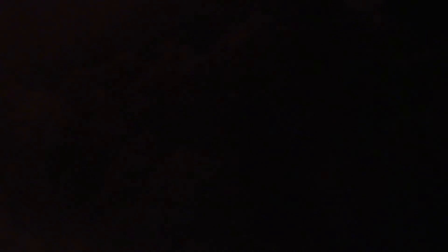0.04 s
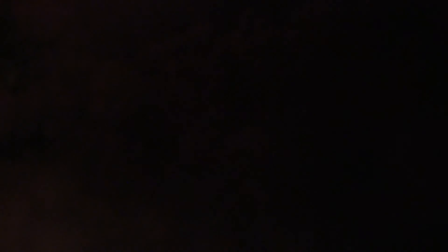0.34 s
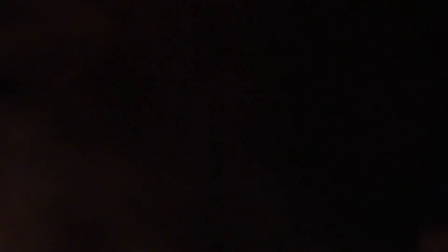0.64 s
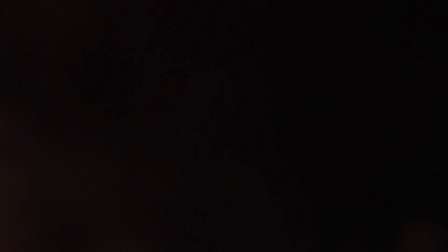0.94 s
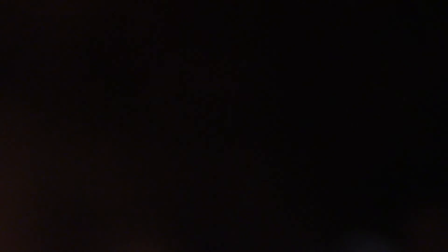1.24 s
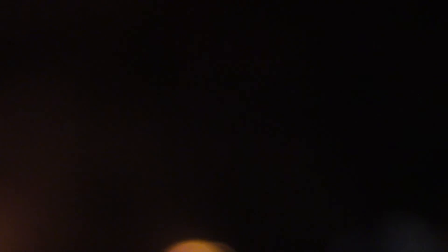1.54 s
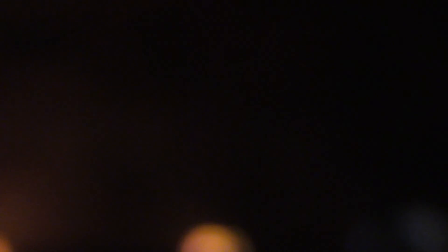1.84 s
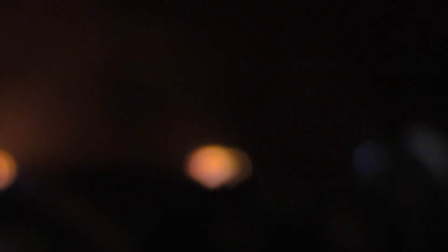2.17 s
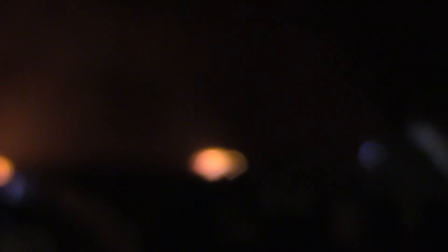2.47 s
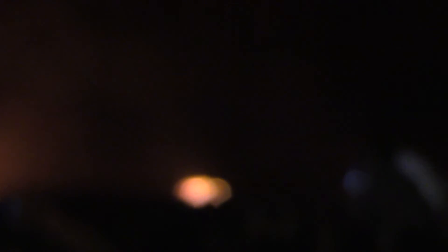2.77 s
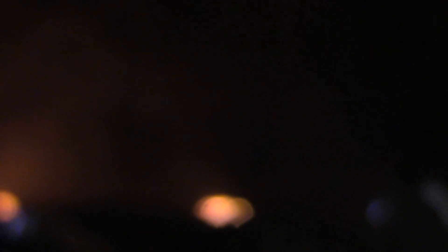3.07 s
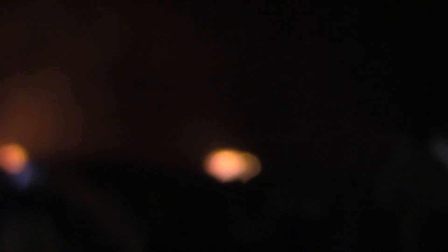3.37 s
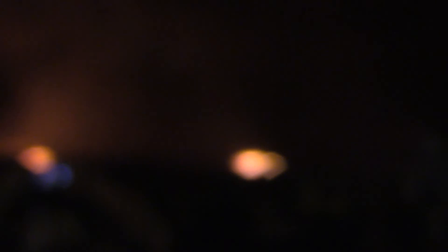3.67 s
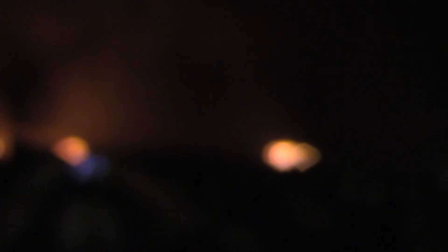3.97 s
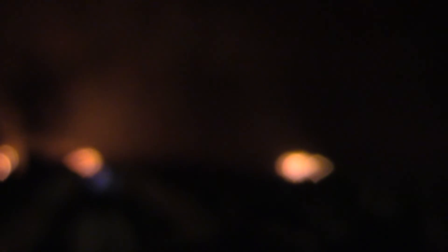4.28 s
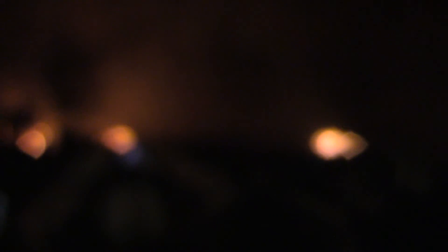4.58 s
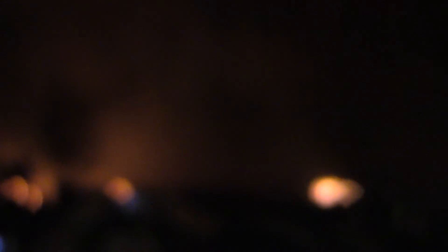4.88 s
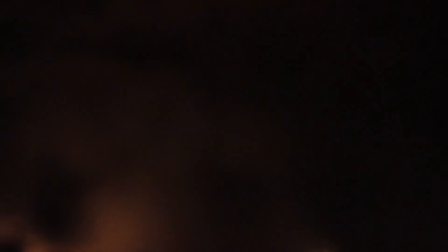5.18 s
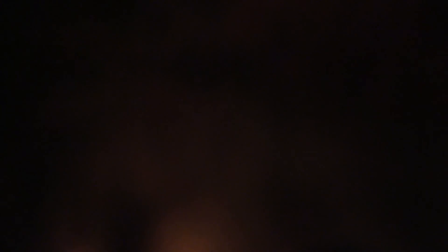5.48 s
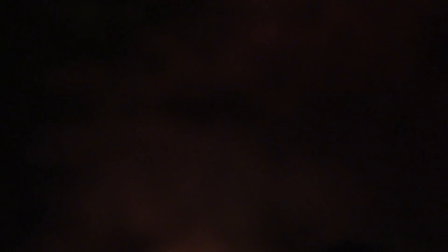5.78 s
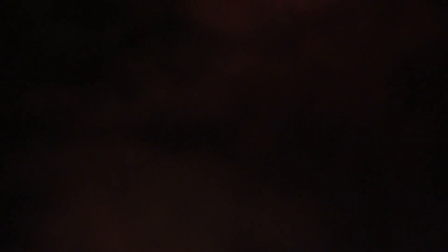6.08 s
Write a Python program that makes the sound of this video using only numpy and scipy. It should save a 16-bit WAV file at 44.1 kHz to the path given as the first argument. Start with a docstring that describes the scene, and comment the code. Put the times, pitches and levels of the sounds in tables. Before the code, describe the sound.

Several machine guns fire overlapping bursts outdoors over a roar of distant shots, growing heavier and ending in a few booms.

```python
"""Machine guns fire over one another on an open range at night, heard from behind the firing line.
A bright gun fires bursts of ringing cracks over a roar of far shots and echoes, heard thin and hollow
until the recorder's wind filter opens and lets the bass in. From 1.5 s a deeper gun keeps up a long
rattle, dotted with rifle pops; it grows heavier and ends near 5 s in a few booms, leaving the roar
and a brief hiss. Scattered reflections smear the reports, so that each swells and then decays."""
import sys
import numpy as np
from scipy import signal
from scipy.fft import rfft, irfft, next_fast_len
from scipy.io import wavfile
from scipy.ndimage import uniform_filter1d, minimum_filter1d

SR = 44100
rng = np.random.default_rng(int(sys.argv[2]) if len(sys.argv) > 2 else 0)


def write(x):
    x = np.atleast_2d(x).T
    wavfile.write(sys.argv[1], SR, np.round(np.clip(x, -1, 1) * 32767).astype(np.int16))


N = 274302
TIME = np.arange(N) / SR
FFT_SIZE = next_fast_len(N + 8192)
FREQS = np.arange(FFT_SIZE // 2 + 1) * SR / FFT_SIZE

# spectrum of a gun's crack: (frequency [Hz], level [dB])
CRACK_SPECTRUM = [(40.0, -34), (150.0, -39), (500.0, -15.5), (1500.0, 2.5), (3500.0, 6.5), (6000.0, -5),
                  (9000.0, -15), (12000.0, -26.5), (15000.0, -58)]


def from_db(db):
    """Amplitude grows tenfold for every 20 dB."""
    return 10 ** (np.asarray(db) / 20)


def at_time(rows, s):
    """Linear interpolation of a table's columns in time."""
    times, *columns = np.transpose(rows)
    return np.array([np.interp(s, times, c) for c in columns])


def at_hz(rows, hz):
    """Interpolation of a table's columns on a logarithmic frequency axis."""
    points, *columns = np.transpose(rows)
    return np.array([np.interp(np.log(hz + 1), np.log(points), c) for c in columns])


def filtered(x, response):
    """Convolution in time is multiplication by a frequency response."""
    return irfft(rfft(x, FFT_SIZE) * response, FFT_SIZE)[..., :N]


def coloured(x, spectrum):
    """Zero-phase filtering imposes a tabulated spectrum."""
    return filtered(x, from_db(at_hz(spectrum, FREQS)[0]))


def resonant(x, resonances):
    """Resonances and antiresonances make bell-shaped peaks and dips in the spectrum."""
    gain_db = sum(db * np.exp(-((FREQS - hz) / width_hz) ** 2) for hz, width_hz, db in resonances)
    return filtered(x, from_db(gain_db))


def scatter(per_s, spread_db):
    """Scattering: two uncorrelated showers of wavefronts of uneven size, with unit power per Hz."""
    arrives = rng.random((2, N)) < per_s / SR
    sizes = from_db(spread_db * np.clip(rng.standard_normal((2, N)), -2, 2))
    fronts = arrives * sizes * rng.choice([-1, 1], (2, N))
    return fronts / fronts.std() * np.sqrt(SR / 2)


def swells(times, levels_db, rise_s, decay_s):
    """Reverberant envelope: reflections build up and die away; incoherent reports add in power."""
    age = TIME[:SR // 2]
    shape = (1 - np.exp(-(age / rise_s) ** 2)) * np.exp(-age / decay_s)
    power = np.zeros(N)
    for s, db in zip(times, levels_db):
        start = int(np.clip(s * SR, 0, N - 1))
        power[start:start + len(shape)] += (from_db(db) * shape[:N - start]) ** 2
    return np.sqrt(power)


def far_rattle(nominal_per_s, uneven_db, decay_s, guns=4):
    """Superposition of far guns, each cycling at its own rate, gives an envelope of mean power 1."""
    rates = nominal_per_s * np.linspace(.75, 1.3, guns)[:, None]
    times = ((np.arange(160) + rng.random((guns, 1))) / rates).ravel()
    levels = uneven_db * rng.standard_normal(len(times))
    heard = times < TIME[-1]
    envelope = swells(times[heard], levels[heard], rise_s=0.0024, decay_s=decay_s)
    return envelope / np.sqrt(np.mean(envelope ** 2))


def roar(rattle_share, hollow_octaves, frame=2048):
    """Far shots and echoes superpose, heard thin and hollow until the recorder's wind filter opens."""
    # base spectrum: (frequency [Hz], level [dB])
    spectrum = [(40.0, -62), (90.0, -48), (150.0, -30.5), (230.0, -19.5), (380.0, -10.5), (520.0, -6),
                (800.0, -3.5), (1300.0, 0), (2300.0, -1), (3600.0, -0.67), (5700.0, -11), (7500.0, -21),
                (10000.0, -32.5), (15000.0, -71)]
    # four registers, the bass let in as the wind filter opens; each: (time [s], level [dB])
    bass = [(0, -63), (1.2, -62.5), (2.04, -68), (2.09, -62), (3.2, -53), (4.3, -51), (4.9, -46),
            (5.15, -38), (5.45, -42.5), (5.8, -38.5), (6.22, -41)]
    low_mid = [(0, -56.5), (1.2, -57), (2.1, -63), (2.53, -64), (2.57, -64), (3.1, -60.5), (4.0, -55.5),
               (4.7, -48), (5.2, -45.5), (5.7, -46), (6.22, -45.5)]
    high_mid = [(0, -51.5), (0.35, -52.5), (0.6, -51.5), (1.3, -53), (1.55, -53.5), (2.4, -56.5),
                (3.2, -51), (4.85, -51), (5.3, -51.5), (5.42, -55.5), (5.55, -53), (6.22, -60)]
    treble = [(0, -50), (0.36, -52.5), (0.6, -51), (1.36, -51.5), (1.5, -57), (2.5, -58), (2.9, -52.5),
              (5.3, -51.5), (5.42, -56), (5.55, -56), (6.22, -74)]
    # reach of the registers: (frequency [Hz], weights of bass, low mid, high mid, treble [0-1])
    weights = [(60, .4, 0, 0, .6), (130, 1, 0, 0, 0), (250, 1, 0, 0, 0), (560, 0, 1, 0, 0),
               (1100, 0, .25, .75, 0), (2600, 0, 0, 1, 0), (7500, 0, 0, 0, 1)]
    # course of the wind filter's dip: (time [s], centre [Hz], depth [dB])
    wind_filter_dip = [(0, 348, 8), (2.04, 343, 12.5), (2.08, 506, 15), (2.53, 480, 10), (2.56, 560, 0.5),
                       (3.6, 660, -2), (4.4, 420, 0.5), (6.2, 403, 4)]
    rattle = far_rattle(nominal_per_s=11.0, uneven_db=3.0, decay_s=0.044)
    wash = scatter(per_s=14000, spread_db=1.0) * np.sqrt(1 - rattle_share + rattle_share * rattle ** 2)
    hz, s, frames = signal.stft(wash, SR, nperseg=frame)
    registers_db = np.vstack([at_time(curve, s) for curve in (bass, low_mid, high_mid, treble)])
    level_db = at_hz(spectrum, hz).T + at_hz(weights, hz).T @ registers_db
    centre_hz, depth_db = at_time(wind_filter_dip, s)
    hollow_db = depth_db * np.exp(-(np.log2((hz[:, None] + 1) / centre_hz) / hollow_octaves) ** 2)
    return signal.istft(frames * from_db(level_db - hollow_db), SR, nperseg=frame)[1][:, :N]


def echo_tones(width_hz):
    """Gliding tones swell and fade like echoes; phase diffusion widens each into a narrow band."""
    # (time [s], frequency [Hz], glide [octaves/s], level [dB], decay [s])
    tones = [(0, 2210, -0.024, -22.5, 0.17), (0.39, 2200, -0.1, -23, 0.09), (3.09, 527, 0.043, -29, 0.088),
             (4.995, 562, -0.076, -20, 0.055), (5.015, 646, 0.031, -17, 0.07), (5.1, 803, 0.082, -22, 0.13),
             (5.145, 605, 0.3, -23, 0.07), (5.19, 656, 0.6, -17, 0.081), (5.286, 522, -0.079, -11.5, 0.03),
             (5.322, 698, -0.74, -12, 0.05), (5.385, 650, -0.5, -25, 0.04), (5.465, 718, -1.3, -17, 0.035),
             (6.16, 676, 0.054, -17.5, 0.053)]
    ringing = np.zeros(N)
    for s, hz, glide, db, decay_s in tones:
        pitch = hz * 2 ** (glide * np.clip(TIME - s, 0, .5))
        waver = rng.standard_normal(N) * np.sqrt(2 * np.pi * width_hz / SR)
        phase = np.cumsum(2 * np.pi * pitch / SR + waver)
        ringing += np.sin(phase) * swells([s], [db], rise_s=0.01, decay_s=decay_s)
    return signal.sosfilt(signal.butter(2, [400, 2600], "band", fs=SR, output="sos"), ringing)


def bright_rounds(cycle_s=0.13):
    """Periodic firing: the times of the bright gun's rounds while its trigger is held."""
    # (first round [s], trigger released [s])
    bursts = [(0.03, 0.1), (0.368, 0.56), (0.64, 1.35)]
    return np.concatenate([np.arange(start, stop, cycle_s) for start, stop in bursts])


def bright_gun(repeat_share, crack_db=-49, sizzle_db=-62, sizzle_lag_s=0.018):
    """Multipath echo: part of each ringing crack returns by the same paths every round."""
    # metallic ring: (frequency [Hz], width [Hz], gain [dB])
    resonances = [(1320, 100, 6), (1590, 120, -8), (2120, 45, 1.5), (2240, 55, -4), (2560, 240, -5),
                  (3080, 55, 4), (3250, 55, 1.5), (4400, 260, -7)]
    # (frequency [Hz], level [dB])
    sizzle_spectrum = [(1000, -22), (4000, 10), (7000, 1), (10000, -9), (13000, -23), (15000, -28)]
    times = bright_rounds()
    impulses = np.zeros(N)
    impulses[(times * SR).astype(int)] = 1
    smear = swells([0], [crack_db], rise_s=0.029, decay_s=0.058)
    same_paths = filtered(scatter(per_s=15000, spread_db=1.0) * smear, rfft(impulses, FFT_SIZE))
    echo_power = np.abs(filtered(impulses, rfft(smear ** 2, FFT_SIZE)))
    new_paths = scatter(per_s=12000, spread_db=4.5) * np.sqrt(echo_power)
    crack = np.sqrt(repeat_share) * same_paths + np.sqrt(1 - repeat_share) * new_paths
    sizzle = scatter(per_s=4000, spread_db=7.0)
    sizzle *= swells(times + sizzle_lag_s, [sizzle_db] * len(times), rise_s=0.0072, decay_s=0.017)
    return resonant(coloured(crack, CRACK_SPECTRUM), resonances) + coloured(sizzle, sizzle_spectrum)


def booms(afterring_db=-13, bright_thud_db=-79.5, bright_lag_s=0.0061):
    """Impulsive heavy reports: crack and punch decay fast, a deep thud and a hollow ring more slowly."""
    # (time [s], thud [dB], punch [dB], crack [dB], decay of punch and crack [s])
    reports = [(0.486, -80, -63, -50.5, 0.013), (0.635, -79, -64, -66, 0.012),
               (0.786, -86, -67, -59, 0.014), (1.189, -85, -72, -58, 0.012), (3.202, -73, -51, -52.5, 0.02),
               (3.589, -76, -52, -53.5, 0.016), (4.938, -51, -51, -57.5, 0.014),
               (4.981, -57, -42.5, -52, 0.02), (5.287, -67, -46, -58, 0.019)]
    # spectra, each: (frequency [Hz], level [dB])
    thud_spectrum = [(35.0, -23), (70.0, -16), (115.0, 0.5), (200.0, 7), (400.0, 6.5), (900.0, -11),
                     (3000.0, -44)]
    punch_spectrum = [(100.0, -39), (300.0, -11), (420, 2), (530, 10), (720, 3), (890, 12), (1020, 8.5),
                      (1150.0, 9), (2500.0, -17), (6000.0, -40), (15000.0, -42)]
    ring_spectrum = [(200, -44), (430, -3), (620, 3), (700, 2), (830, -5), (1100, -9), (3000, -47)]
    times, thud_db, punch_db, crack_db, decays_s = np.transpose(reports)
    # each round of the bright gun adds a faint thud too
    thuds = [*zip(times, thud_db)] + [(s + bright_lag_s, bright_thud_db) for s in bright_rounds()]
    thud = scatter(per_s=2000, spread_db=3.5) * swells(*np.transpose(thuds), rise_s=0.0068, decay_s=0.027)
    envelopes = np.array([swells([s], [0], rise_s=0.0031, decay_s=d) for s, d in zip(times, decays_s)])
    punch = scatter(per_s=2300, spread_db=2.0) * (from_db(punch_db) @ envelopes)
    crack = scatter(per_s=11000, spread_db=6.5) * (from_db(crack_db) @ envelopes)
    ring = scatter(per_s=2500, spread_db=4.5)
    ring *= swells(times, punch_db + afterring_db, rise_s=0.044, decay_s=0.15)
    return (coloured(thud, thud_spectrum) + coloured(punch, punch_spectrum)
            + coloured(crack, CRACK_SPECTRUM) + coloured(ring, ring_spectrum))


def deep_guns(start_s=1.532, stop_s=5.08, cycle_s=0.1028, jitter_s=0.0055, uneven_db=0.8):
    """Single shots and a quasi-periodic burst: each round is a crack plus a duller muzzle blast."""
    # shots of other guns, then the deeper gun's crescendo: (time [s], crack [dB], muzzle blast [dB])
    single_shots = [(0.225, -58, -70), (2.685, -51.5, -52), (2.918, -51.5, -52), (3.185, -54, -50.5),
                    (3.572, -53, -50), (4.0, -58, -64), (4.625, -55, -50), (4.825, -57, -56),
                    (4.955, -45, -56), (5.165, -56.5, -49.5), (5.259, -50.5, -46), (5.45, -58, -47.5),
                    (5.775, -68, -58)]
    crescendo = [(1.53, -74, -68), (2.0, -67, -75), (2.48, -60.5, -88), (2.6, -59, -61),
                 (3.05, -57.5, -50.5), (4.5, -52.5, -45), (4.85, -48.5, -44)]
    # (frequency [Hz], level [dB])
    blast_spectrum = [(40.0, -54), (100.0, -28), (150.0, -35), (300.0, -15), (500.0, -1), (1200.0, -8.5),
                      (3000.0, 0.5), (6000.0, -28.5), (15000.0, -53)]
    cycles = np.arange(start_s, stop_s, cycle_s)
    deviations = rng.standard_normal((len(cycles), 2)) * [jitter_s, uneven_db]
    burst = [(s + late, *(at_time(crescendo, s) + db)) for s, (late, db) in zip(cycles, deviations)]
    times, crack_db, blast_db = np.transpose(burst + single_shots)
    crack = scatter(per_s=12000, spread_db=4.0) * swells(times, crack_db, rise_s=0.033, decay_s=0.05)
    blast = scatter(per_s=2500, spread_db=6.5) * swells(times, blast_db, rise_s=0.031, decay_s=0.063)
    return coloured(crack, CRACK_SPECTRUM) + coloured(blast, blast_spectrum)


def bullet_snaps():
    """A bullet's shock front arrives by the direct path as one sharp impulse."""
    # (time [s], level [dB])
    shocks = [(0.488, -6), (1.2, 0), (2.731, 1), (2.968, -5), (3.224, -3), (3.612, 5), (3.856, 5),
              (4.939, -8), (5.243, 0), (5.308, -10)]
    # (frequency [Hz], level [dB])
    spectrum = [(100, -16), (500, -19), (2500, 6), (4000, 16), (6000, -18), (9000, -18), (12000, -34),
                (15000, -50)]
    fronts = np.zeros((2, N))
    for s, db in shocks:
        fronts[0, int(s * SR)] = from_db(db)
    return coloured(fronts, spectrum)


def rifle_pops():
    """Nearer rifles carry little reverberation: a hollow thump and a hard crack, quickly over."""
    # (time [s], thump [dB], crack [dB])
    shots = [(1.655, -68, -62), (2.661, -72, -65), (2.712, -55, -65), (2.946, -52, -64), (3.02, -64, -60),
             (3.112, -52.5, -63), (3.219, -61, -57), (3.738, -56, -67), (3.815, -52, -64),
             (3.847, -66, -57), (4.143, -57, -59), (4.245, -51, -57), (4.657, -50, -63), (5.168, -48, -62),
             (5.602, -47, -68)]
    # (frequency [Hz], level [dB])
    thump_spectrum = [(40, -62), (100, -46), (250, -21), (450, -2), (750, 5.5), (1300, 1), (3000, -12),
                      (8000, -48)]
    times, thump_db, crack_db = np.transpose(shots)
    thump = scatter(per_s=3000, spread_db=3.0) * swells(times, thump_db, rise_s=0.0033, decay_s=0.011)
    crack = scatter(per_s=5000, spread_db=4.0) * swells(times, crack_db, rise_s=0.0043, decay_s=0.016)
    return coloured(thump, thump_spectrum) + coloured(crack, CRACK_SPECTRUM)


def thin_hiss(start_s=6.09, level_db=-71):
    """Band-limited noise gives a faint puff of treble as the firing dies down."""
    # (frequency [Hz], level [dB])
    spectrum = [(3000, -30), (6000, -1), (7500, 5), (9000, -21), (13000, -20), (15000, -32)]
    envelope = swells([start_s], [level_db], rise_s=0.035, decay_s=0.032)
    return coloured(scatter(per_s=7700, spread_db=4.0) * envelope, spectrum)


def two_ports(mid, diffuse, treble_hz, fade_s=0.004):
    """Closely spaced ports hear long waves alike; treble is louder on the right and leads on the left."""
    # side signal coherent with the mid: (frequency [Hz], right lean [ratio], left lead [ratio])
    bearing = [(1000, .2, 0.1), (2200, 0.28, 0.03), (4000, 0.48, -.05), (5400, .5, 0), (6300, .32, .3),
               (9000, 0.29, .4), (12000, 0.14, .15), (14500, .06, .05)]
    # (frequency [Hz], side relative to mid [dB])
    side_spectrum = [(60, -14), (200, -52), (550, -84), (1100, -42.5), (2400, -20.5), (3400, -16.5),
                     (4400, -9.5), (6000, -2.5), (8100, -3), (10500, -0.5), (14000, 6)]
    # the treble narrows as the firing grows heavy: (time [s], side gain [dB])
    treble_spread = [(0, 4.5), (1.7, 4.5), (2.6, 0), (3.4, -0.5), (5.2, -10), (6.2, -30)]
    lean, lead = at_hz(bearing, FREQS)
    incoherent = np.sqrt(np.clip(1 - lean ** 2 - lead ** 2, 0, 1))
    width = from_db(at_hz(side_spectrum, FREQS)[0])
    soft_ends = np.minimum(1, np.minimum(TIME, TIME[::-1]) / fade_s)
    side = filtered(mid * soft_ends, width * (1j * lead - lean))
    side += filtered(diffuse * soft_ends, width * incoherent)
    treble = filtered(side, FREQS ** 4 / (FREQS ** 4 + treble_hz ** 4))
    side += treble * (from_db(at_time(treble_spread, TIME)[0]) - 1)
    return np.array([mid + side, mid - side])


def limiter(x, ceiling=0.93, window=64):
    """Peak limiting: the gain ducks for a moment around any peak that would overload."""
    gain = np.minimum(1, ceiling / (np.abs(x).max(axis=0) + 1e-9))
    return x * uniform_filter1d(minimum_filter1d(gain, 2 * window), window)


def scene():
    """Guns and echoes superpose at the two microphone ports."""
    guns = bright_gun(repeat_share=0.17) + deep_guns() + booms() + rifle_pops() + bullet_snaps()
    mid, diffuse = guns + roar(rattle_share=0.15, hollow_octaves=0.48) + thin_hiss()
    return two_ports(mid + echo_tones(width_hz=5.0), diffuse, treble_hz=5860)


def record(dry):
    """Housing resonances colour the sound, a limiter holds the peaks and a low-pass cuts the top."""
    # peaks and dips of the microphone housing: (frequency [Hz], width [Hz], gain [dB])
    housing = [(685, 54, -1), (1460, 120, 0.7), (1900, 180, -0.5), (2270, 250, 2.5), (2720, 86, 1.1),
               (3400, 270, 0), (4150, 430, -2), (5100, 500, -0.5), (5760, 510, -4), (8100, 360, 1.3)]
    low_pass = signal.ellip(10, .1, 80, 15400, fs=SR, output="sos")
    return signal.sosfilt(low_pass, limiter(resonant(dry, housing)))


dry = scene()
out = record(dry)
write(out)
```